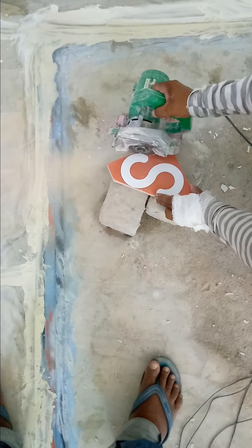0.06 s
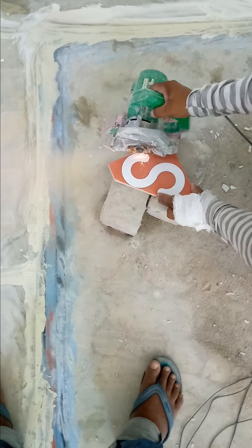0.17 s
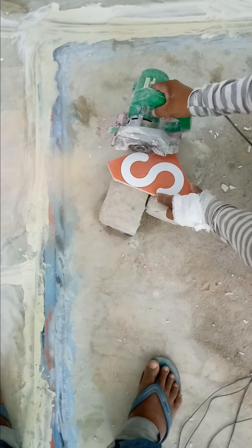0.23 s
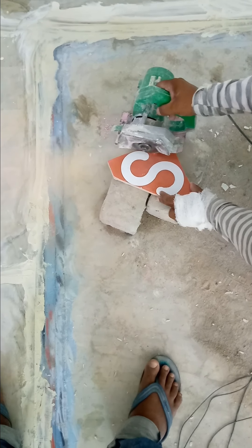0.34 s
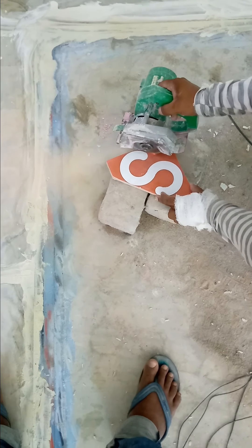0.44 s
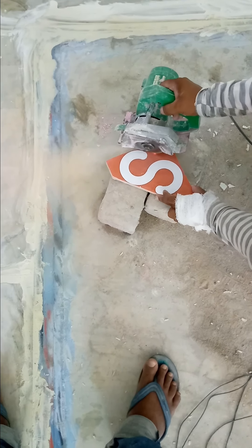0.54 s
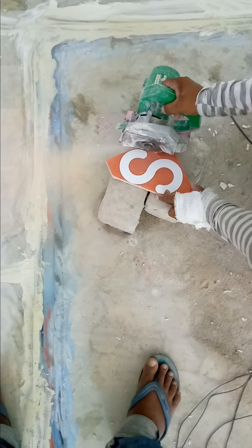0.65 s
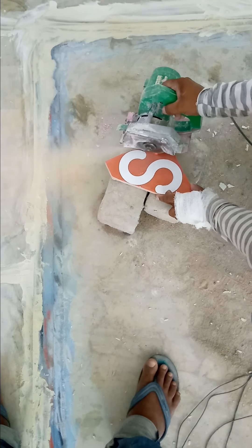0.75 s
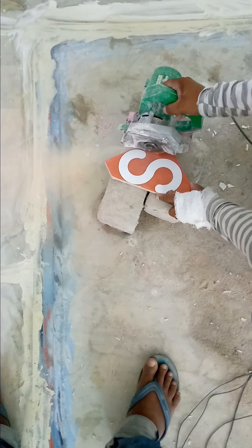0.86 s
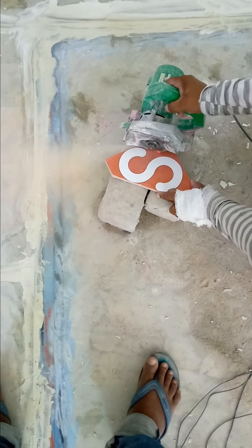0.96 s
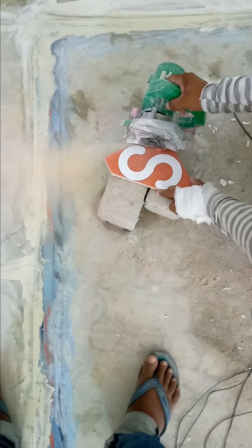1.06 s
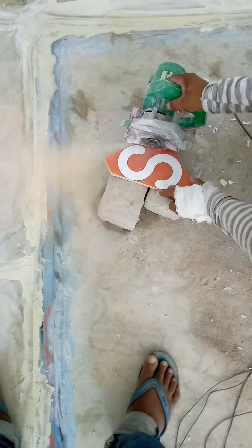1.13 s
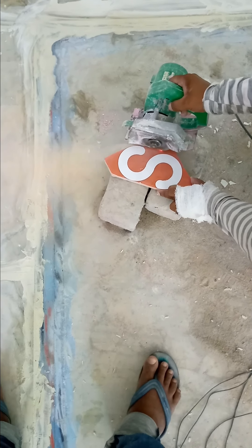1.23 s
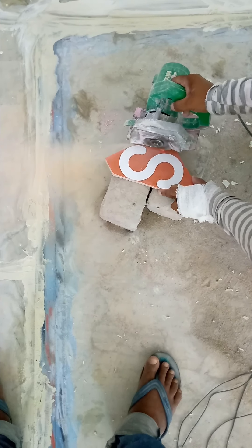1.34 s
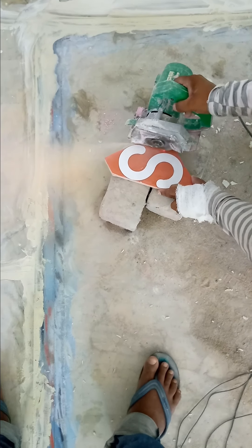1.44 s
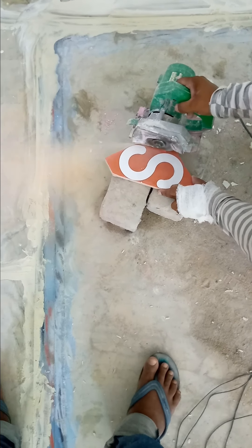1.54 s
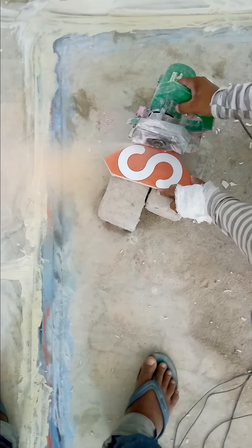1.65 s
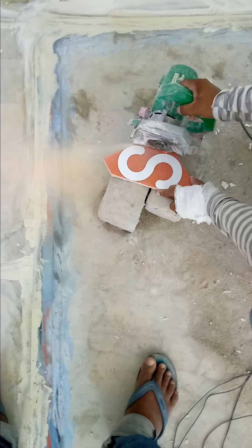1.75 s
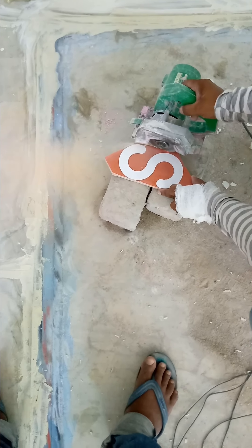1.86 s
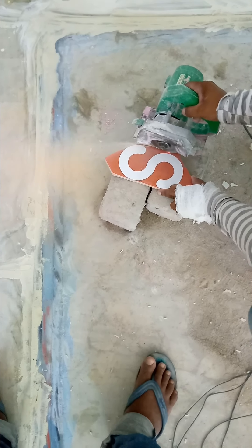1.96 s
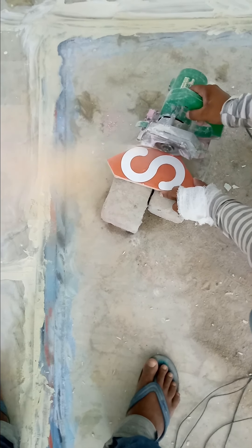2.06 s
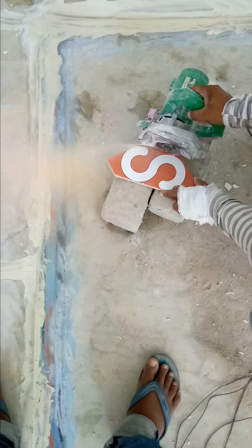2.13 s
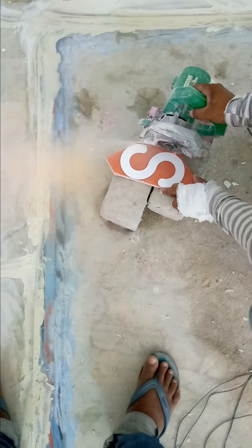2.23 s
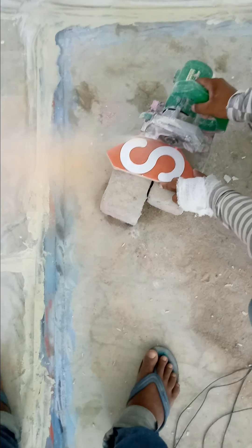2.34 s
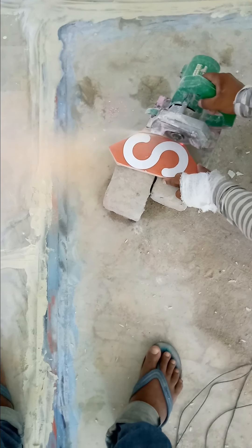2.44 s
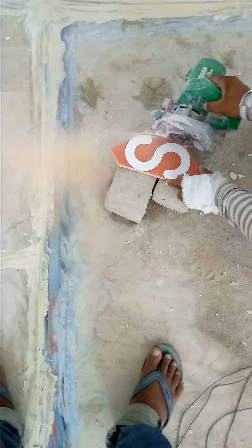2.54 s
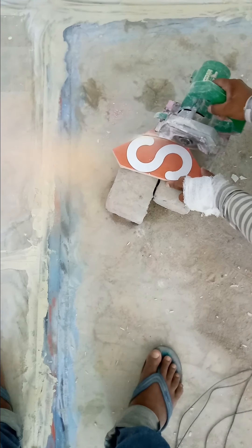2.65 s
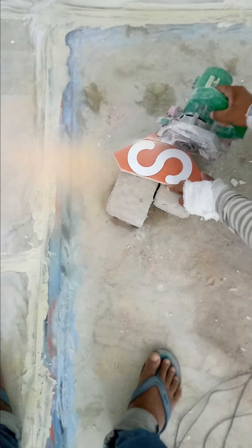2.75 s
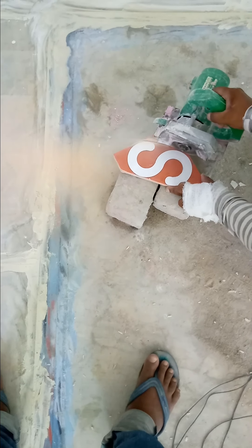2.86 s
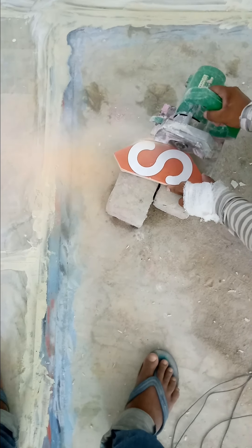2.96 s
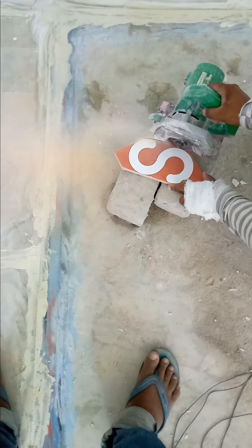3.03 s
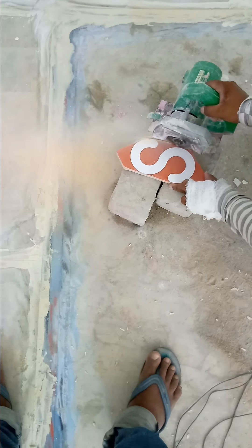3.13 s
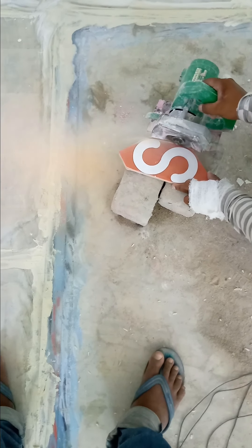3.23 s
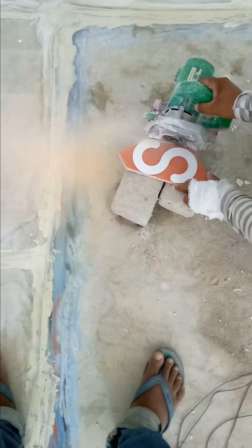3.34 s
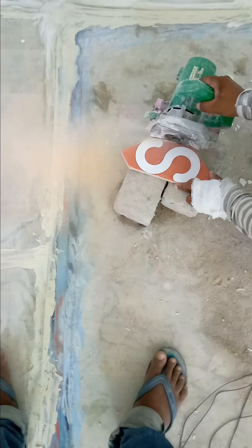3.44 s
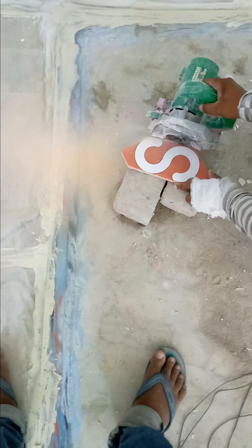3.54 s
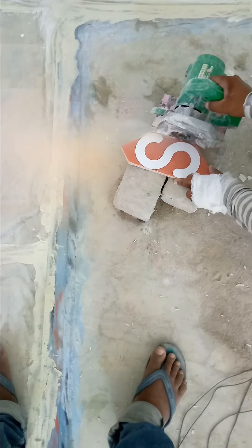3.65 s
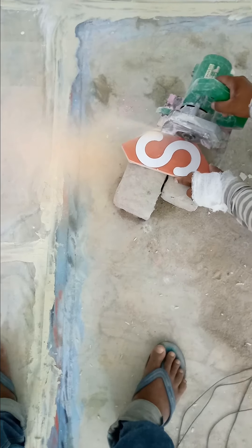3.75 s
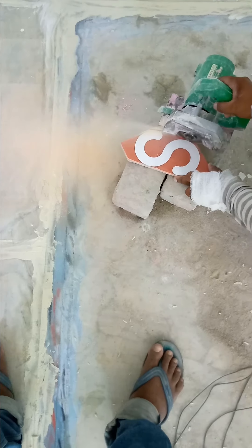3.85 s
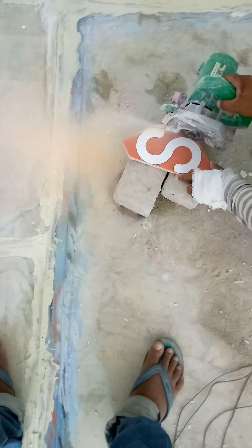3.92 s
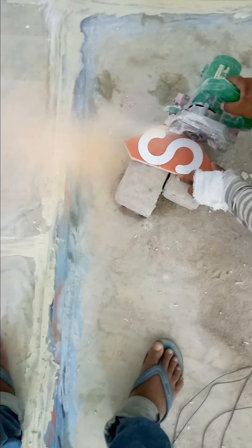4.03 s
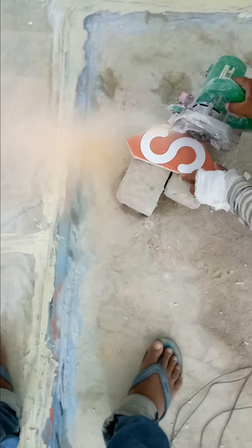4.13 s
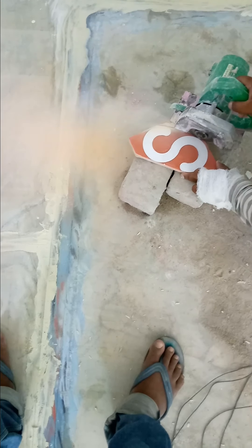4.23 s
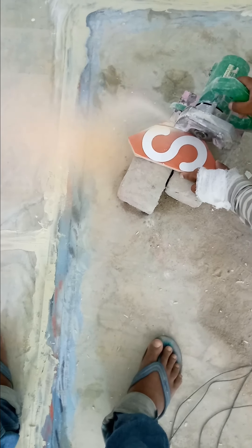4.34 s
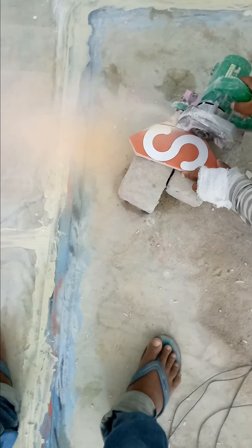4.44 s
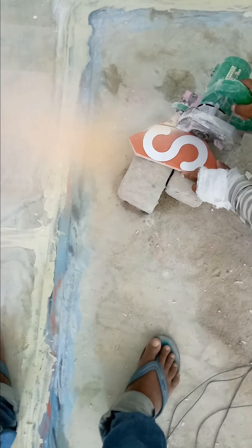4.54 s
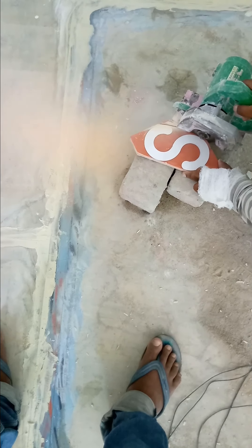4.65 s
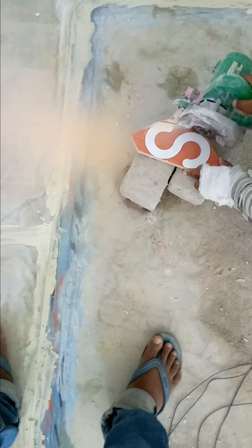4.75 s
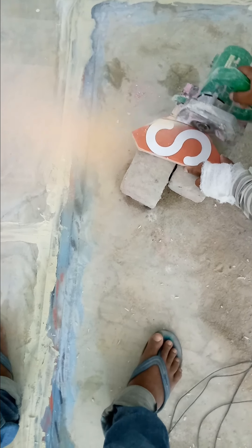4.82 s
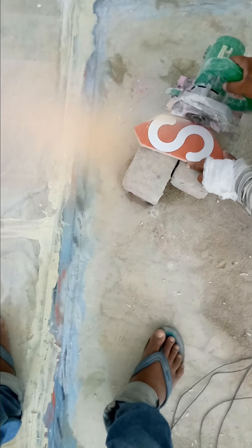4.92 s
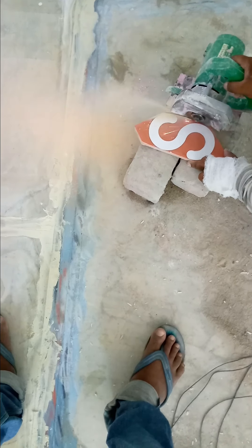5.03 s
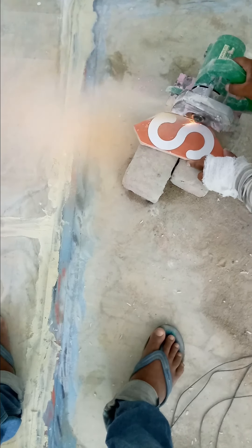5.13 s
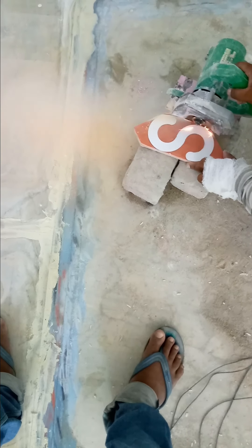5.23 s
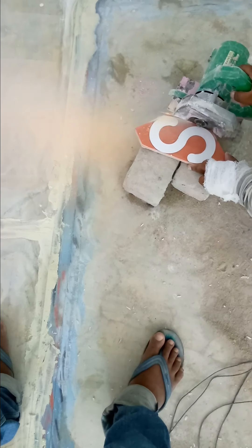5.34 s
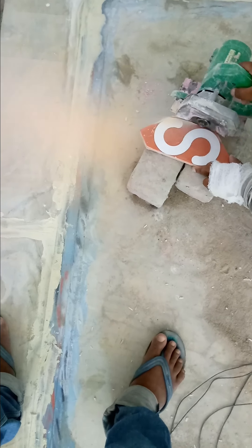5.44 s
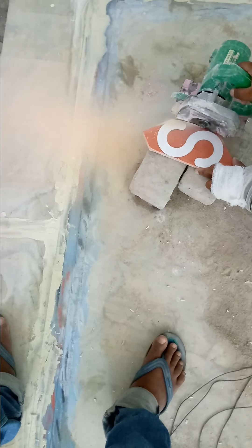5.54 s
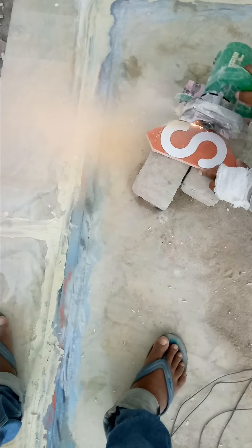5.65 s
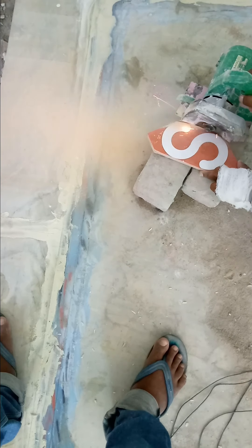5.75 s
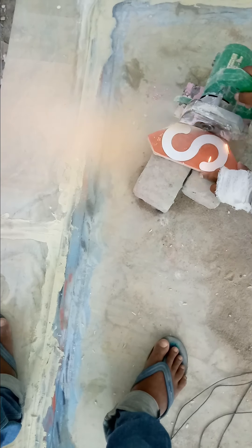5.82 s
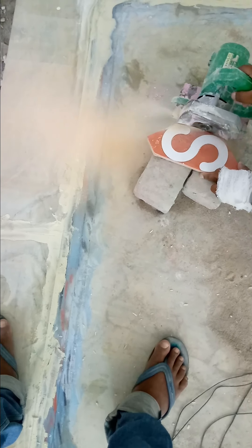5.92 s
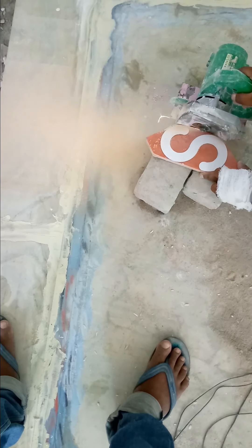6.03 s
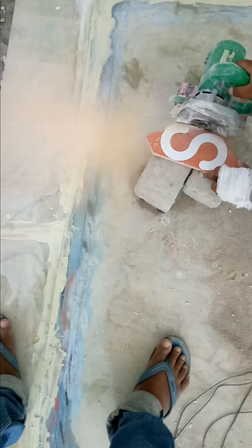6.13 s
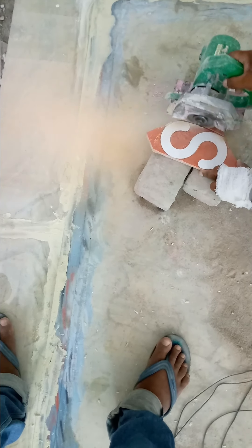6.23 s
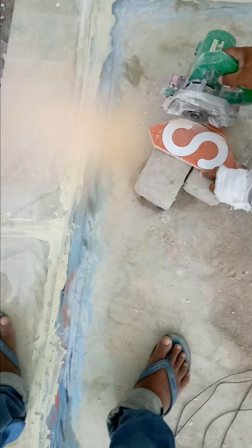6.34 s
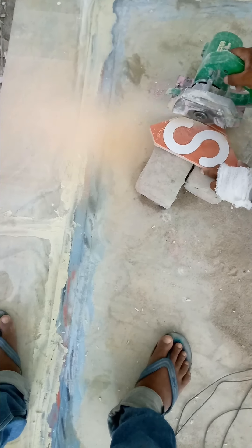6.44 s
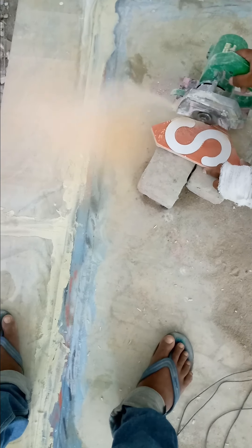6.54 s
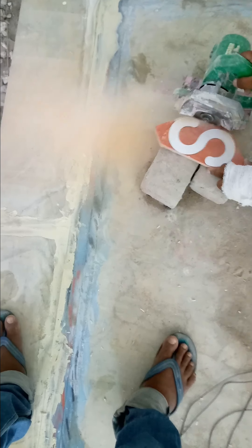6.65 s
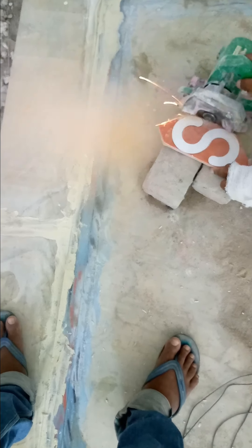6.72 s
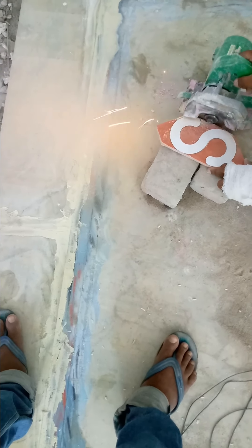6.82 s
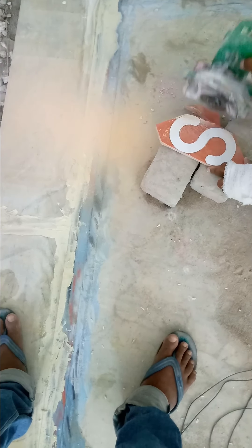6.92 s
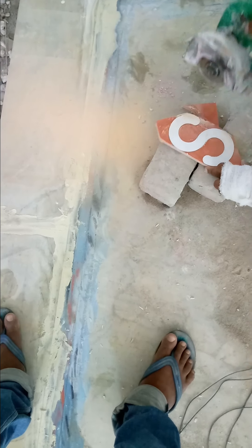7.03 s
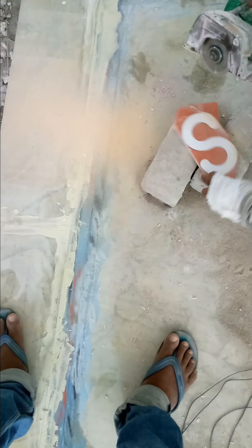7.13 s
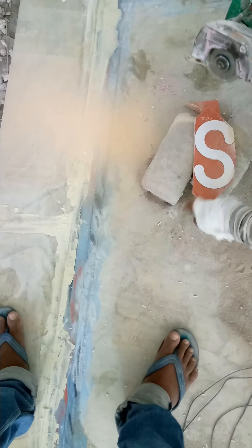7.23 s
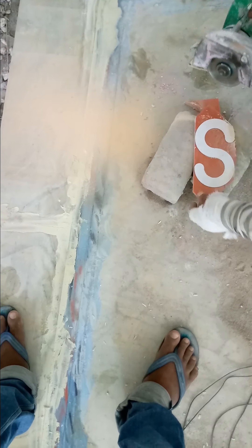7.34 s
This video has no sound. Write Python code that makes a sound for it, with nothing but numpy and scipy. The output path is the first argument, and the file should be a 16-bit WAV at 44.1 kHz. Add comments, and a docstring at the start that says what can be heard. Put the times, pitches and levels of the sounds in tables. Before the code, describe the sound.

A handheld electric cutter shrieks through stone up close, its metallic whine swelling and easing with gritty rasp and crackle, then lifts and whirrs free.

```python
"""A handheld electric cutter drives its diamond blade through a stone tile, close to a small microphone.
From the start the hand pushes and eases off in turn: grit keeps the steel blade ringing near 6 kHz, the kerf
rasps, the tile booms and dust sprays; hard grains crack out and loud crests overload the microphone and sputter.
Near the end the blade grazes the edge a few times, is lifted clear and rings on faintly
in the rush of its fan and the rising whirr of its gears. Floor and walls answer with faint echoes."""
import sys
import numpy as np
from scipy import signal
from scipy.fft import rfft, irfft
from scipy.io import wavfile
from scipy.ndimage import uniform_filter1d, minimum_filter1d

SR = 44100
rng = np.random.default_rng(int(sys.argv[2]) if len(sys.argv) > 2 else 0)


def transcribe(u):
    """Save the signal u as a 16-bit wav file named by the first command-line argument.

    u: samples, shape (n,) or (channels, n), limited to [-1, 1]; the rate is SR.
    q: integer samples, one column per channel.
    """
    v = np.clip(np.atleast_2d(u).T, -1, 1)
    q = np.round(v * 32767).astype(np.int16)
    wavfile.write(sys.argv[1], SR, q)


N = 325458
TIME = np.arange(N) / SR

# how hard the rim rubs sideways: (time [s], share of the rasp [0-1])
SIDEWAYS = [(0, 0.19), (1.1, 0.39), (1.65, 0.28), (2.27, 0.21), (2.57, 0.51), (2.8, 0.23), (3.4, 0.27),
            (3.87, 0.31), (4.17, 0.5), (4.33, 0.47), (4.51, 0.9), (4.72, 0.28), (4.97, 0.3), (5.11, 0.86),
            (5.37, 0.5), (5.88, 0.66), (6.3, 0.41), (6.55, 0.72)]

# how each layer answers the hand: (level at light contact [dB], change per push [dB/dB],
# change per easing [dB/dB], change when fully sideways [dB], change at full depth [dB])
RING_LAW = (-17.5, 0.34, -0.54, -8.5, -0.2)
RASP_LAW = (-28, 0, -.5, 3.5, 1)
SIZZLE_LAW = (-32, 0.1, -0.7, 0, -1)
TILE_LAW = (-44.5, 0.95, -0.6, -3, 3.5)
STONE_LAW = (-37, 0.84, -0.71, -2.5, 0)
SPRAY_LAW = (-39.5, 0.13, -1.0, 2.5, 5.5)
SPUTTER_LAW = (-41.5, 1.47, -1.9, -8, -0.5)
# upper main blade mode against the lower: pushing favours the upper, easing and sideways rubbing the lower
LEAN_LAW = (1.5, 0.33, -0.1, -11.5, 1)

# the blade backs out of the kerf to brush the edge, later the rim leaves the stone: (start [s], end [s])
BACK_OUT_S, LIFT_S = (6.49, 6.515), (6.70, 6.81)
# change of each layer while the rim only brushes the edge
BRUSH_STEEL_DB, BRUSH_RASP_DB, BRUSH_STONE_DB, BRUSH_SPRAY_DB = -16, -7.5, -5, -10
# the steel catches again at once after an easing, the stone breaks a little later
STEEL_RETURN_S, STONE_RETURN_S = 0.0088, 0.043
# slow unrest of blade pitch, mode balance and sputter; quicker flicker of the layers
UNREST_HZ, FLICKER_HZ = 7.3, 50


def gain_of(db):
    """Decibels to amplitude."""
    return 10 ** (np.asarray(db) / 20)


def evened(x):
    """Scales to rms 1."""
    return x / np.sqrt(np.mean(x ** 2) + 1e-20)


def follow(rows):
    """Every column of a curve table, sample by sample."""
    s, *columns = np.transpose(rows)
    return [np.interp(TIME, s, c) for c in columns]


def wander(rate_hz):
    """Smooth chance of rms 1: noise that falls off steeply above rate_hz."""
    hz = np.fft.rfftfreq(N, 1 / SR)
    spectrum = rfft(rng.standard_normal(N)) / np.sqrt(1 + (hz / rate_hz) ** 4)
    return evened(irfft(spectrum, N))


def colour(x, points, size=4096):
    """Causal minimum-phase filter with the given spectrum."""
    f, db = np.transpose(points)
    hz = abs(np.fft.fftfreq(size, 1 / SR))
    log_gain = np.log(gain_of(np.interp(np.log(hz + 1), np.log(f), db)))
    # the Hilbert transform of the log gain gives the phase
    taps = np.fft.ifft(np.exp(np.conj(signal.hilbert(log_gain)))).real
    return signal.oaconvolve(x, taps[:size // 2])[:N]


def resonate(x, hz, width_hz):
    """A steep resonance of gain 1, fixed or moving: shift down to 0 Hz, smooth, shift back."""
    turn = np.exp(2j * np.pi * np.cumsum(hz * np.ones(N)) / SR)
    r = np.exp(-np.pi * width_hz / SR)
    smooth = signal.lfilter([(1 - r) ** 2], [1, -2 * r, r * r], x / turn)
    return 2 * (turn * smooth).real


def grit(force):
    """Countless tiny fractures, as strong as the contact force."""
    return force * rng.standard_normal(N)


def modes(force, table):
    """Each mode is driven by its own share of the grit."""
    return sum(gain_of(db) * resonate(grit(force), hz, width) for hz, width, db in table)


def strikes(kicks, length_s):
    """One short smooth push for each grain, which peaks after length_s."""
    u = TIME[:2048] / length_s
    return signal.oaconvolve(kicks, u * np.exp(1 - u))[:N]


def in_cut(lifted):
    """1 while the blade touches the stone, the given value once it is lifted clear."""
    return np.interp(TIME, LIFT_S, [1, lifted])


def workshop(x):
    """Floor and nearby walls send back a faint, short spray of echoes."""
    wet_db, t60, t = -18, .15, TIME[:SR // 4]
    echoes = rng.choice([-1., 1.], len(t)) * (rng.random(len(t)) < 2000 / SR)
    # nothing returns in the first 3 ms
    taps = echoes * (t > .003) * gain_of(-60 * t / t60)
    return x + gain_of(wet_db) * signal.oaconvolve(x, taps / np.linalg.norm(taps))[:N]


def free_run():
    """The fan's steady rush of air is heard louder after the cut, and the gears whirr higher."""
    # whirr of the gears as the freed motor speeds up: (time [s], pitch [Hz], level [dB])
    spin_up = [(6.68, 5200, -49), (6.77, 5360, -30), (6.92, 5600, -33.5), (7.1, 5880, -32),
               (7.38, 6440, -33.5)]
    # rush of the cooling fan: (frequency [Hz], relative density [dB per Hz])
    fan_spectrum = [(30, -56), (100, -28), (200, -20), (350, -11), (550, -2.5), (800, 1), (1200, 1),
                    (1900, -7), (3400, -5.5), (4300, -7), (5600, -2.5), (6700, -9), (7500, -19),
                    (9000, -23), (13800, -26), (15000, -14)]
    during_db, after_db, rise_db_per_s = -42.5, -31, 2
    whirr_hz, whirr_db = follow(spin_up)
    whirr = gain_of(whirr_db) * evened(resonate(rng.standard_normal(N), whirr_hz, width_hz=770))
    # the rush comes up quickly as the cut ends, then keeps growing slowly
    during = np.interp(TIME, (6.68, 6.755), [1, 0])
    rush_db = during * during_db + (1 - during) * (after_db + rise_db_per_s * (TIME - LIFT_S[1]))
    return whirr + gain_of(rush_db) * evened(colour(rng.standard_normal(N), fan_spectrum))


def held(start, length, rise_s, fall_s):
    """Attack, hold and release of one move of the hand, 0-1."""
    release = max(length, rise_s)
    return np.interp(TIME - start, [0, rise_s, release, release + fall_s], [0, 1, 1, 0])


def pushing():
    """The hand leans on the cutter: push, extra boom and extra ring in dB, sample by sample."""
    # (start [s], length [s], push [dB], extra boom of the tile [dB], extra ring of the blade [dB])
    pushes = [(0.038, 0.055, 4.5, -8, -1), (0.286, .25, 3, 1.5, 0), (0.737, .10, 3, -1.5, 0),
              (1.03, 0.053, 3, -2, -1.5), (1.271, 0.048, 8, -10, -1), (1.38, 0.13, 5, -3, 0),
              (1.822, 0.15, 3, 2, 0.5), (2.014, 0.37, 2.5, 3, 1), (2.447, 0.037, 4.5, -2, 3.5),
              (2.683, 0.16, 2.5, 4, 1), (2.868, 0.27, 4, 1, 0), (3.233, 0.027, 6.5, -2, 0),
              (3.53, 0.17, 3.5, -2, 0.5), (3.73, .21, 6, 0, 0), (3.99, .17, 8.5, -1.5, 0.5),
              (4.205, 0.14, 4.5, -8, 0), (4.736, .09, 2, 0, 0.5), (4.82, .15, 4.5, 3, -2.5),
              (5.28, 0.17, 4.5, 1, 0.8), (5.645, .24, 4, 1.5, -1.5), (6.003, 0.042, 4.5, -5, 3),
              (6.261, 0.22, 5.5, -1, -0.5)]
    moves = np.array([held(s, length, rise_s=0.018, fall_s=0.065) for s, length, *_ in pushes])
    return np.array(pushes)[:, 2:].T @ moves


def easing(return_s):
    """The hand lets go slowly and the rim barely touches: easing in dB, sample by sample."""
    # (start [s], length [s], easing [dB])
    easings = [(0.58, 0.14, 0.5), (1.11, 0.044, 0.5), (2.487, .035, 6), (2.564, 0.08, 1), (3.36, .14, -0.4),
               (3.936, .035, 0), (4.555, 0.13, 4), (5.165, .115, 4.5), (5.567, 0.07, 3.5), (5.91, .06, 2.5),
               (6.082, 0.1, 15)]
    return sum(db * held(s, length, 0.03, return_s) for s, length, db in easings)


def answer(law, push_db, ease_db):
    """Level in dB by one law, from the pressure of the hand, the twist of the rim and the depth of the kerf."""
    # depth of the blade in the kerf: (time [s], share [0-1])
    depth = [(0, 0.36), (1.45, 0.4), (2.1, 0.2), (3.2, .35), (3.55, 0.16), (4.3, .9), (5.0, 0.9), (5.85, 1),
             (6.2, .45), (6.5, 1)]
    light_db, per_push, per_ease, sideways_db, deep_db = law
    hand_db = per_push * push_db + per_ease * ease_db
    return light_db + hand_db + sideways_db * follow(SIDEWAYS)[0] + deep_db * follow(depth)[0]


def level(law, push_db, ease_db, brush_db, flicker_db=.6):
    """Flickering gain of one layer: its law in the kerf, less while brushing the edge, nothing once lifted."""
    backed_out_db = np.interp(TIME, BACK_OUT_S, [0, brush_db])
    return in_cut(0) * gain_of(answer(law, push_db, ease_db) + backed_out_db + flicker_db * wander(FLICKER_HZ))


def hard_grains(pressure_db):
    """One kick for each hard grain that catches the blade, among small random ones, more often under pressure."""
    # hard grains that catch the blade: (time [s], relative level [dB])
    bites = [(0.828, -20), (1.205, -21), (1.283, -23), (1.308, -17), (1.324, -19), (1.342, -23),
             (1.415, -19.5), (1.511, -19), (1.699, -18), (1.76, -20.5), (1.861, -23), (1.918, -19),
             (1.997, -19.5), (2.355, -19), (2.668, -21), (2.767, -18), (2.798, -25), (2.914, -21),
             (2.97, -20), (3.193, -27), (3.259, -15), (3.45, -26), (3.636, -13.5), (3.776, -15),
             (3.791, -22), (3.836, -23), (3.895, -20), (3.928, -20.5), (3.991, -17), (4.004, -24),
             (4.025, -25), (4.045, -17), (4.062, -17), (4.087, -16), (4.101, -14), (4.121, -26),
             (4.149, -9), (4.179, -21), (4.206, -20), (4.246, -19), (4.289, -18.5), (4.346, -13.5),
             (4.418, -20), (4.809, -16.5), (4.834, -11), (4.857, -22), (4.875, -23), (4.91, -22),
             (5.668, -22), (5.71, -20), (5.798, -20.5), (6.014, -23), (6.032, -21), (6.065, -21),
             (6.264, -22.5), (6.357, -17), (6.37, -21), (6.434, -26), (6.475, -26)]
    light_per_s, rate_growth, grain_db, spread_db = 5, 2.8, -27, 2  # growth in dB per dB of pressure
    rate = light_per_s * gain_of(rate_growth * pressure_db) * np.interp(TIME, BACK_OUT_S, [1, 0])
    sizes = gain_of(grain_db + spread_db * rng.uniform(-0.61, 1, N))
    kicks = sizes * (rng.random(N) < rate / SR)
    for s, db in bites:
        kicks[round(s * SR)] = gain_of(db)
    return kicks


def chips(per_s=170., spread_db=2.5, decay_s=0.00062):
    """Small chips snap off at random: each a sudden jump of force that dies at once."""
    sizes = gain_of(spread_db * np.minimum(rng.exponential(1, N), 3.5))
    jumps = sizes * (rng.random(N) < per_s / SR)
    return signal.lfilter([1], [1, -np.exp(-1 / (decay_s * SR))], jumps)


def contact(kicks, judder_db=0.5, chatter_db=0.26, turn_db=1.75, chip=0.52, bite=11.0, bite_s=0.00016):
    """Force on the rim: the hand judders, the rim rubs harder once a turn and snaps off chips, grains bite."""
    mean_turns_hz = 126.6
    turns = np.cumsum(mean_turns_hz * (1 + 0.0898 * wander(25.1))) / SR
    unrest_db = judder_db * wander(25.0) + chatter_db * wander(360) + turn_db * np.sin(2 * np.pi * turns)
    # the chip jumps are weaker once the blade is lifted
    force = gain_of(unrest_db) * (1 + chip * in_cut(.2) * chips())
    return evened(force) * (1 + bite * strikes(kicks, bite_s))


def grazes(fade=0.62):
    """Envelopes of ring, rasp and spray as the rim brushes the edge: a sudden touch that eases off."""
    # (start [s], length [s], ring [dB], rasp [dB], spray [dB])
    touches = [(6.139, 0.012, -22, -33, -48), (6.168, 0.018, -28, -32, -50),
               (6.556, 0.032, -23.5, -25, -37), (6.613, 0.029, -27, -27, -46),
               (6.652, 0.037, -38, -24.5, -43), (6.691, 0.013, -23, -24, -29)]
    out = np.zeros((3, N))
    for s, length, *db in touches:
        u = np.clip((TIME - s) / length, 0, 1)
        out += gain_of(db)[:, None] * np.minimum(20 * u, 1) * (1 - u ** 2) ** fade
    return out


def spray(force):
    """Dust thrown from the kerf hisses with the fractures of the stone."""
    # (frequency [Hz], relative density [dB per Hz])
    spray_spectrum = [(7000, -11), (9500, -8.5), (10450, -13), (10850, 3.5), (11200, 1.5), (11650, 1),
                      (12100, -2.5), (12700, -2), (13100, -3), (13900, -5), (15500, -15)]
    return evened(colour(grit(force), spray_spectrum))


def tile(force):
    """The tile booms in one broad resonance, driven by the grit."""
    return evened(resonate(grit(force), 1312, width_hz=470))


def breaking_stone(force):
    """Brittle stone crumbles in countless fractures, coloured by one broad spectrum."""
    # (frequency [Hz], relative density [dB per Hz])
    stone_spectrum = [(150, -18), (400, -10), (900, -4), (1280, -8), (1750, -1.5), (2300, -6), (2750, -4),
                      (3350, 2.5), (4100, -1.5), (5500, -19), (9000, -29), (14000, -33)]
    return evened(colour(grit(force), stone_spectrum))


def knocks(kicks, pop_s=0.00031, low_hz=95, crack_db=0., crack_s=0.00061, push_db=0.5):
    """A hard grain breaks out with a crack and overloads the microphone: one inward push that swings back."""
    # crack of a hard grain breaking out: (frequency [Hz], relative density [dB per Hz])
    crack_spectrum = [(200, -25), (600, -1), (1400, 3.5), (2200, 2), (3500, -4), (4500, -1), (7000, -2),
                      (14000, -24)]
    high_pass = signal.butter(2, low_hz, "high", fs=SR, output="sos")
    push = signal.sosfilt(high_pass, -strikes(kicks, pop_s))
    crack = colour(grit(strikes(kicks, crack_s)), crack_spectrum)
    return gain_of(push_db) * push + gain_of(crack_db) * crack


def sputter(ring):
    """The microphone flattens crests on one side only, so each burst of ring leaves a low pop."""
    # (frequency [Hz], relative density [dB per Hz])
    sputter_spectrum = [(20, -34), (50, -6.5), (85, 1), (125, 2.5), (200, 3.5), (450, -3.5), (900, -4),
                        (2000, -6.5), (3500, -7), (4800, -26), (6000, -70), (20000, -64)]
    knee, ceiling = 1.0, 2.0
    crests = np.maximum(ceiling * np.tanh(ring / ceiling) - knee, 0)
    pops = colour(crests.mean() - crests, sputter_spectrum)
    # the pops keep an even strength over a fraction of a second
    return pops / np.sqrt(uniform_filter1d(pops ** 2, size=3500) + 1e-12)


def rasp(force, rim_db=1.5):
    """Scraping in the kerf, which turns to a broad screech when the rim rubs sideways."""
    # scrape: (frequency [Hz], relative density [dB per Hz])
    rasp_spectrum = [(3800, -37), (4350, -12.5), (4560, -1.5), (4750, -8), (5150, -10), (5700, 8),
                     (6300, 2), (6800, -24), (7600, -1), (8300, -24), (10400, -18.5), (13500, -33)]
    # modes of the rim rubbing on the wall of the kerf: (frequency [Hz], width [Hz], relative level [dB])
    rim_modes = [(4536, 180, -10), (4940, 430, -4.5), (5167, 250, -2), (5340, 190, -0.5), (5635, 210, 2.5),
                 (6223, 160, 3.5), (6680, 1100, -12), (7900, 200, -12), (11430, 580, -9)]
    share = np.clip(follow(SIDEWAYS)[0], 0, 1)
    scrape = evened(colour(grit(force), rasp_spectrum))
    screech = gain_of(rim_db) * evened(modes(force, rim_modes))
    return np.sqrt(1 - share) * scrape + np.sqrt(share) * screech


def sizzle(force):
    """The highest blade modes answer the sharpest contacts most; half as strong once lifted."""
    # (frequency [Hz], width [Hz], relative level [dB])
    sizzle_modes = [(14290, 260, -5), (14720, 520, -4), (15150, 420, 0), (15420, 300, -5)]
    return in_cut(.5) * evened(modes(force ** 1.5, sizzle_modes))


def blade(force, lean_db):
    """The steel disc rings in two main modes and higher ones, which weaken when it leaves the stone."""
    # pitch of the lower main mode: (time [s], frequency [Hz])
    whine = [(0, 6016), (1.1, 5960), (2.0, 5914), (2.7, 5956), (2.85, 6073), (4.6, 6020), (5.1, 6128),
             (6.4, 5924), (6.85, 5870)]
    # higher modes: (frequency [Hz], width [Hz], relative level [dB])
    upper_modes = [(7064, 183, -8.5), (7424, 186, -11.5), (7810, 204, -17), (8300, 190, -21.5),
                   (9034, 300, -19), (9910, 230, -23), (11150, 120, -22.5), (12440, 180, -22)]
    # pitch and balance never hold quite still
    whine_hz = follow(whine)[0] + 10 * wander(UNREST_HZ)
    lean_db = lean_db + 1.5 * wander(UNREST_HZ)
    lower = (whine_hz, 250, -lean_db / 2)
    upper = (6520, 190, 1.5 + lean_db / 2)
    return evened(modes(force, [lower, upper]) + in_cut(0.41) * modes(force, upper_modes))


def scene(knock_db=1.0, spiky=1.34, stone_spiky=1.72):
    """All the layers of the cut share one hand and one contact force."""
    push_db, boom_db, ring_db = pushing()
    steel_ease_db, stone_ease_db = easing(STEEL_RETURN_S), easing(STONE_RETURN_S)
    ring_level = level(RING_LAW, push_db, steel_ease_db, BRUSH_STEEL_DB) * gain_of(ring_db)
    rasp_level = level(RASP_LAW, push_db, steel_ease_db, BRUSH_RASP_DB)
    sizzle_level = level(SIZZLE_LAW, push_db, steel_ease_db, BRUSH_RASP_DB)
    sputter_level = level(SPUTTER_LAW, push_db, steel_ease_db, BRUSH_STEEL_DB)
    sputter_level *= gain_of(2 * wander(UNREST_HZ))
    tile_level = level(TILE_LAW, push_db, stone_ease_db, BRUSH_STONE_DB) * gain_of(boom_db)
    stone_level = level(STONE_LAW, push_db, stone_ease_db, BRUSH_STONE_DB)
    spray_level = level(SPRAY_LAW, push_db, stone_ease_db, BRUSH_SPRAY_DB)
    ring_graze, rasp_graze, spray_graze = grazes()
    kicks = hard_grains(push_db - stone_ease_db)
    force = contact(kicks)
    # brittle stone answers the peaks of force most
    stone = tile_level * tile(force ** spiky)
    stone += stone_level * breaking_stone(force ** stone_spiky)
    stone += np.hypot(spray_level, spray_graze) * spray(force ** spiky)
    # the steel still sings once the blade spins free
    lifted = 1 - in_cut(0)
    ring = blade(force, answer(LEAN_LAW, push_db, steel_ease_db))
    steel = (np.hypot(ring_level, ring_graze) + lifted * gain_of(-31)) * ring
    steel += np.hypot(rasp_level, rasp_graze) * rasp(force)
    # the top sizzle flickers most
    sizzle_flicker = gain_of(1.1 * wander(FLICKER_HZ))
    steel += (sizzle_level + lifted * gain_of(-33)) * sizzle_flicker * sizzle(force)
    # the overload arises in the microphone, so it has no echoes
    overload = sputter_level * sputter(ring) + gain_of(knock_db) * knocks(kicks)
    return (workshop(steel + stone + free_run()) + overload)[None]


def record(dry, ceiling=0.43, edge_hz=15530):
    """A fast limiter rounds off the tallest bursts; then a low-pass sets the band limit."""
    # peak level over about 1 ms, smoothed
    crest = uniform_filter1d(-minimum_filter1d(-abs(dry[0]), size=45), size=45)
    limited = dry / (1 + (crest / ceiling) ** 6) ** (1 / 6)
    low_pass = signal.firwin(1023, edge_hz, window=("kaiser", 9), fs=SR)
    return signal.oaconvolve(limited, low_pass[None], "same")


dry = scene()
out = record(dry)
transcribe(out)
```